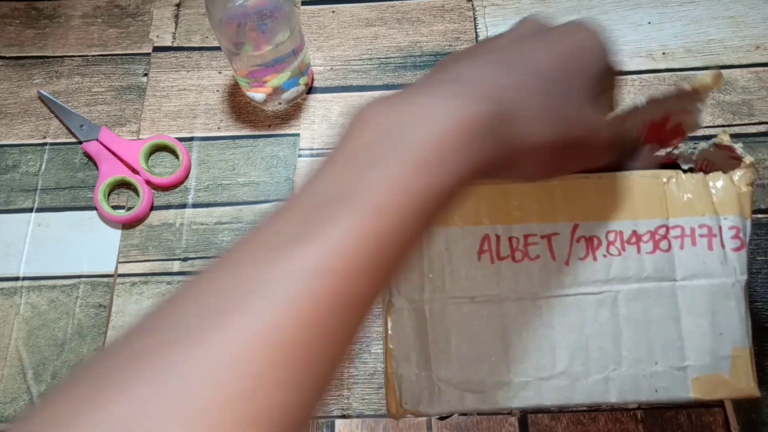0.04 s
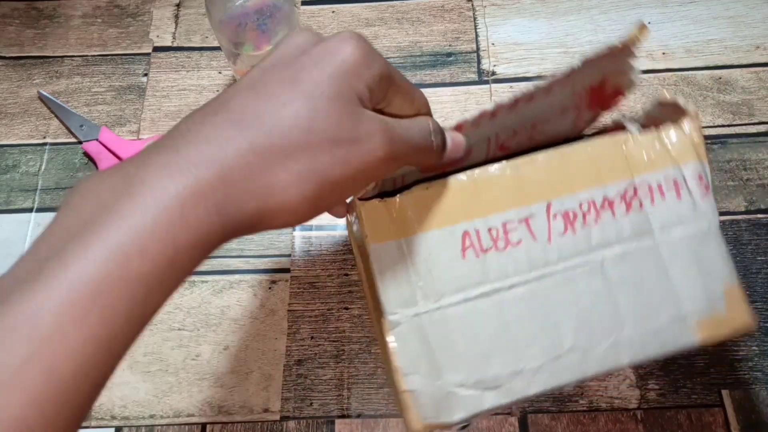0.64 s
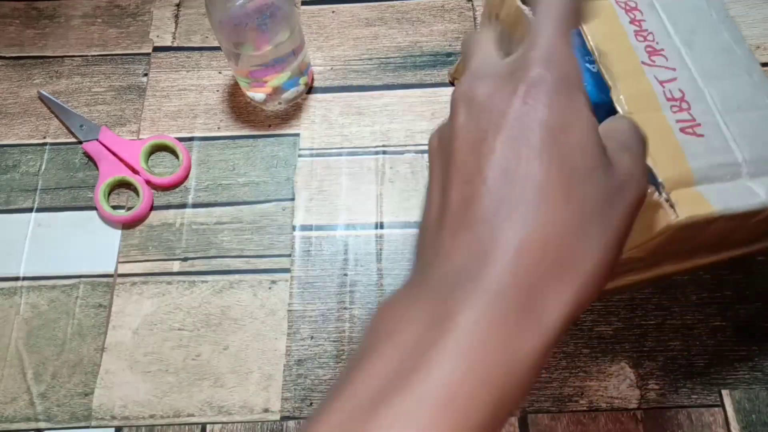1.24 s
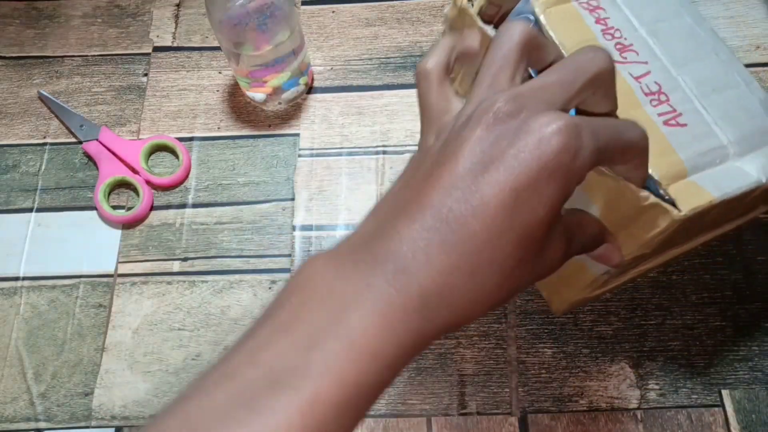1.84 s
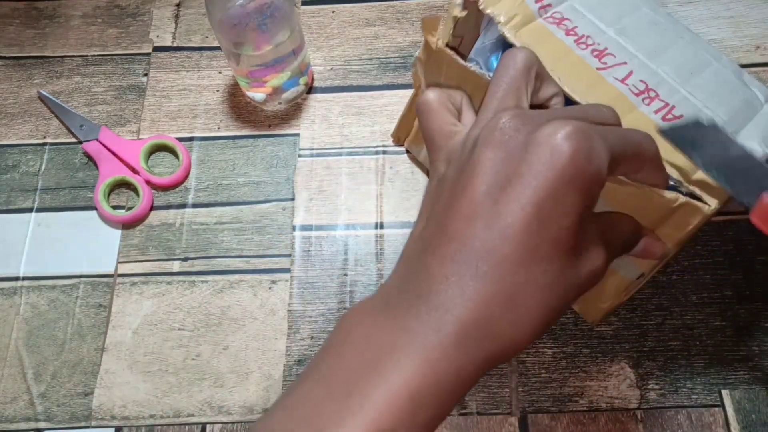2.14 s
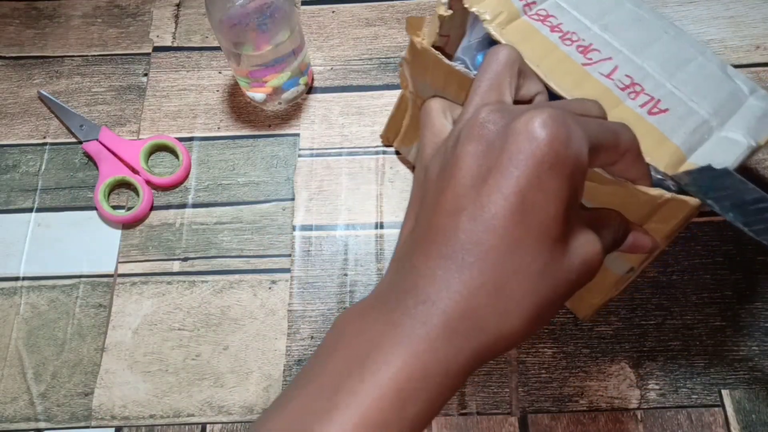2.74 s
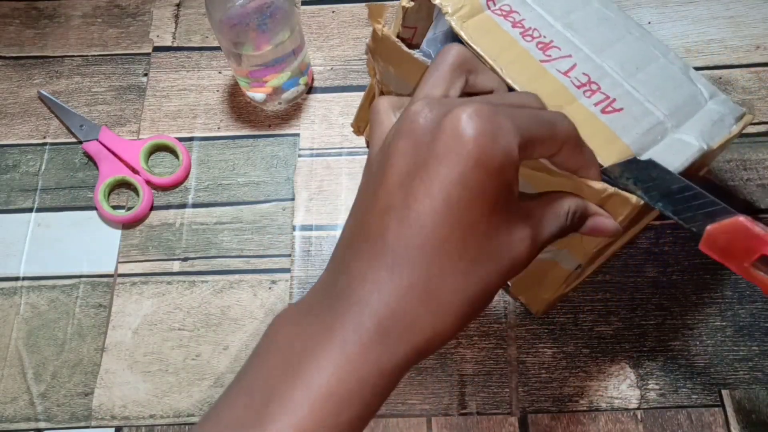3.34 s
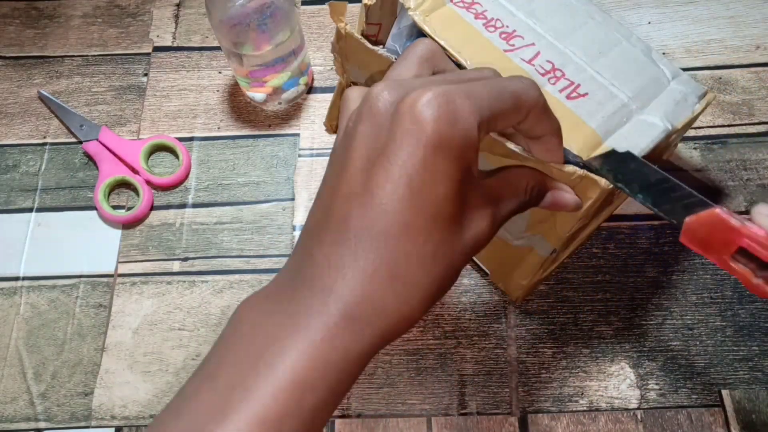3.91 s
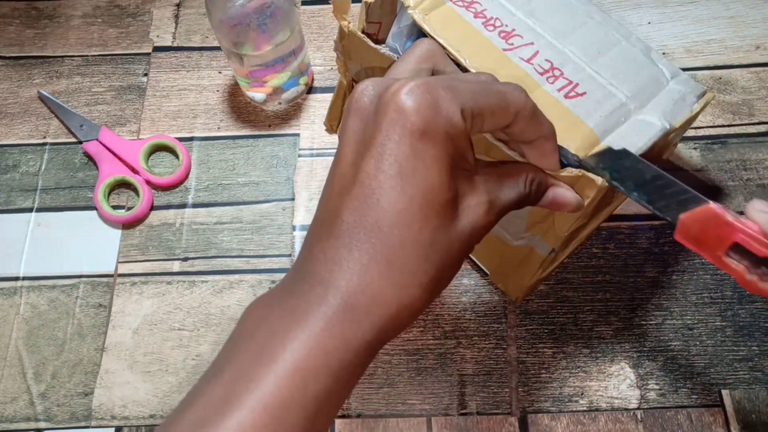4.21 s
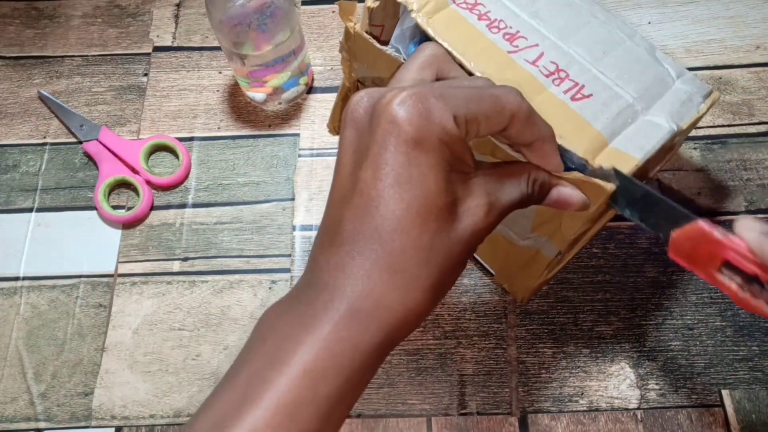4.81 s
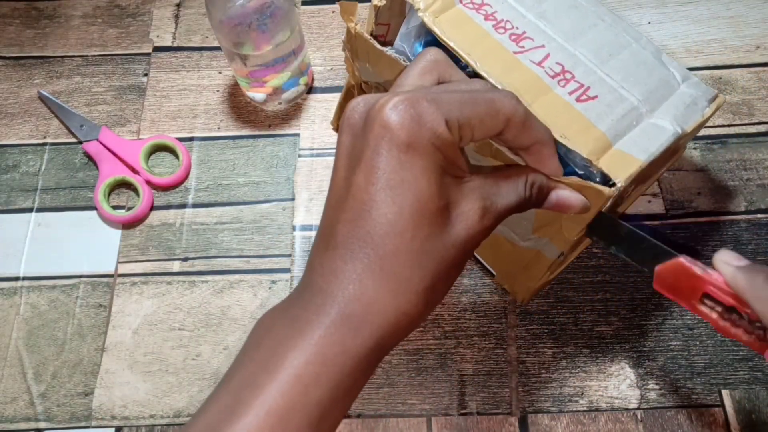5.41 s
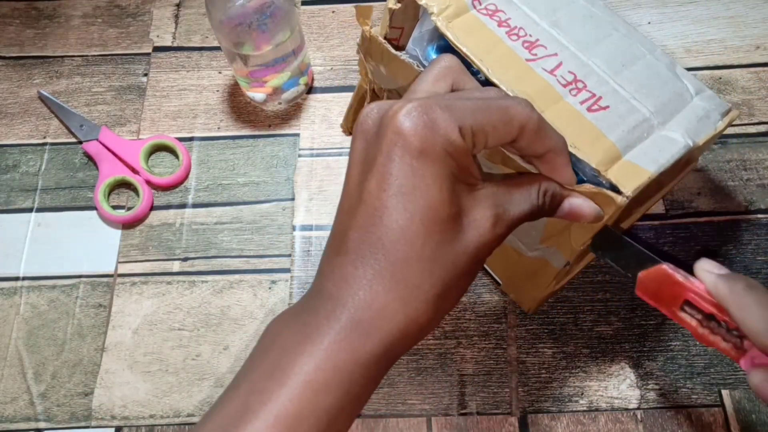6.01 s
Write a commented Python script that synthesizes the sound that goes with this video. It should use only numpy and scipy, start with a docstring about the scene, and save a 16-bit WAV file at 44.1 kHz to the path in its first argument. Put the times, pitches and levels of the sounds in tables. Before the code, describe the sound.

A cardboard parcel rustles and knocks as it is handled, then a box cutter saws through its tape in short strokes, with faint bird chirps.

```python
"""A taped cardboard parcel is gripped, dragged round on a table and pried at: friction makes it rustle
and hiss, its panels buckle with knocks, and its tape ticks and squeaks. From about 4.4 s a box cutter
saws through the taped edge in short strokes, each a stream of snapping fibres that excites the
resonances of box and blade. Throughout, the small, quiet room adds its reverberation, and now and then
a bird chirps some way off."""
import sys
import numpy as np
from scipy import signal
from scipy.fft import rfft, irfft, next_fast_len
from scipy.io import wavfile
from scipy.ndimage import map_coordinates

SR = 44100
rng = np.random.default_rng(int(sys.argv[2]) if len(sys.argv) > 2 else 0)


def digitize_waveform(pressure):
    """Quantize a signal to 16-bit integers and store it at the path in sys.argv[1].

    Rows of a 2-D input are taken as channels; values are limited to [-1, 1].
    """
    field = np.atleast_2d(pressure).T
    bounded = np.clip(field, -1, 1)
    quanta = np.round(bounded * 32767).astype(np.int16)
    wavfile.write(sys.argv[1], SR, quanta)


N = 271656
TIME = np.arange(N) / SR

# Normal modes of the box. Each row: frequency in Hz, bandwidth in Hz, gain in dB.
BOX = [(115.5, 24, -7.5), (174, 42, -10), (279, 83, -12), (303, 21.4, -6.5), (368, 28, -7.5),
       (469.5, 42, -1.5), (540.4, 61, 1.5), (625, 15, -3), (715, 34, 0.5), (724, 30, -21), (883, 13, 2),
       (1040, 68, -22), (1270, 22, -18), (1460, 110, -19), (1600, 55, -15), (1836, 55, -16),
       (2000, 70, -24), (2640, 68, -21)]
# Spectra of rubbed panels and the sliding underside. Each row: frequency in Hz, relative level in dB.
RUSTLE = [(25, -14), (60, -0.5), (100, 3), (200, -4.5), (350, -4), (520, 3.5), (750, 1.5), (1100, -4),
          (1600, -13), (2600, -14.5), (4000, -27), (9000, -41)]
SLIDE = [(300, -39), (1200, 3.5), (2600, 4.5), (3700, -3), (5000, -3), (6500, 1), (8000, 1.5), (11000, 1),
         (14000, -3.5), (16000, -9)]
# A hand shifts its grip or pushes the box. Each row: start in seconds, length in seconds,
# crest as a share of the length, panel rustle in dB, sliding hiss in dB.
RUBS = [(0, 0.16, 0.97, -60, -61.5), (0.154, 0.19, 0.12, -53.5, -55.5), (0.321, 0.16, 0.18, -52, -58.5),
        (0.513, .095, 0.73, -66.5, -72), (0.587, 0.15, 0.046, -55.5, -62),
        (0.707, 0.197, 0.76, -57.5, -51.5), (0.916, 0.042, 0.24, -48, -52),
        (0.972, 0.25, 0.28, -54.5, -51.5), (1.249, 0.13, 0.36, -47.5, -60.5), (1.385, 0.07, 0.11, -62, -74),
        (1.626, 0.069, 1, -60.5, -62), (1.679, 0.14, .12, -51, -58), (1.852, 0.21, 0.074, -58.5, -62.5),
        (2.077, 0.15, 0.62, -61, -62.5), (2.308, 0.026, .15, -52, -60.5), (2.35, 0.2, 0.12, -69.5, -78),
        (2.657, 0.16, .4, -64.5, -71.5), (2.895, 0.23, 0.39, -58, -64.5), (3.155, 0.13, .2, -58, -67),
        (3.351, 0.16, 0.91, -55.5, -68), (3.569, 0.21, 0.76, -57.5, -62.5),
        (3.826, 0.097, .6, -68.5, -73.5), (4.224, 0.13, 0.28, -70, -79.5)]
# The bottom edge digs into the table as the box turns. Each row: start in seconds, length in seconds,
# crest as a share of the length, level in dB.
SCRAPES = [(.75, .135, .8, -56)]

def handling():
    """Sliding friction: fingers catch on the panels, the underside hisses and one edge scrapes."""
    held_rustle_db, held_hiss_db = -79.5, -87  # the hand merely holding the box
    rustle_gain = np.hypot(amp(held_rustle_db), rubbing([(*move, db) for *move, db, _ in RUBS]))
    hiss_gain = np.hypot(amp(held_hiss_db), rubbing([(*move, db) for *move, _, db in RUBS]))
    catches = grains(rate=1400, spread_db=3.2, smooth=.7) * amp(1.4 * wobble(70))
    panels = unit(coloured(catches, RUSTLE) + .5 * unit(ring(catches, BOX)))
    slips = grains(rate=3000, spread_db=2, smooth=.9) * amp(1.3 * wobble(60))
    underside = coloured(slips, SLIDE)
    edge = unit(ring(grains(rate=2500, spread_db=1, smooth=.93), [(6100, 2900, 0)]))
    return rustle_gain * panels + hiss_gain * underside + rubbing(SCRAPES) * edge


# Spectrum of cut fibres. Each row: frequency in Hz, relative level in dB.
FIBRES = [(300, -9), (1200, -18), (2000, 3.5), (3000, -1.5), (4300, -1), (5500, 0), (8000, -1.5),
          (11000, 1), (14000, -3.5), (16000, -11)]
# Normal modes of the blade. Each row: frequency in Hz, bandwidth in Hz, gain in dB.
BLADE = [(4100, 150, -3), (4880, 200, 1), (5430, 130, -5), (6200, 360, 4), (8100, 95, 8), (10600, 570, -4)]
# Strokes of the blade; the wall stiffens as the cut nears the corner. Each row: start in seconds,
# length in seconds, crest as a share of the length, attack in seconds, wall level in dB, rasp level
# in dB, wall resonance in Hz, bass mode gain in dB, blade ring relative to the fibres in dB.
STROKES = [(4.41, 0.075, 0.41, 0.011, -38.5, -49.5, 530, 5, 0),
           (4.584, 0.12, 0.42, .02, -58, -66, 586, 4, -2),
           (4.676, 0.11, 0.73, 0.0081, -46, -58, 524, 7.5, -4),
           (4.804, .05, 0.45, .02, -61.5, -63.5, 543, 13, -20),
           (4.874, 0.069, 0.45, .005, -38.5, -48, 544, -5, -10),
           (5.099, 0.14, 0.64, .014, -40.5, -48.5, 610, 9, -14),
           (5.338, .12, 0.53, 0.056, -43.5, -49.5, 553, 4, -10),
           (5.548, 0.13, 0.38, 0.016, -49.5, -56.5, 596, 10.5, -12),
           (5.798, .11, 0.41, 0.052, -50, -60, 686, -1, -23),
           (6.105, .09, 0.73, .06, -62.5, -66, 640, 4, -9)]

def cutter():
    """Fracture excites resonance: snapping fibres sound directly, through the wall and the steel."""
    out = np.zeros(N)
    fibres = grains(rate=2000, spread_db=3.6, smooth=.45) * amp(1.7 * wobble(180))
    for start, length, crest, attack, wall_db, rasp_db, wall_hz, bass_db, blade_db in STROKES:
        effort = push(length, crest, attack, swell_db=5, drop_db=7, fade_db_per_s=158)
        snaps = np.roll(fibres, -round(start * SR))[:len(effort)]
        # modes near the resonance of the uncut wall respond most strongly
        modes = [(hz, width, db + bass_db * (hz < 450) + 4 * np.exp(-((hz - wall_hz) / 90) ** 2))
                 for hz, width, db in BOX]
        wall = ring(snaps, modes + [(wall_hz, 170, -2)])
        wall = unit(filtered(wall, lambda hz: 1 / (1 + (hz / 2600) ** 4) / (1 + (70 / (hz + 1)) ** 4)))
        tuning = 1 + .049 * rng.standard_normal()  # the blade's free length differs with each stroke
        steel = unit(ring(snaps, [(hz * tuning, width, db) for hz, width, db in BLADE]))
        rasp = unit(coloured(snaps, FIBRES) + amp(blade_db) * steel)
        add(out, start - attack, effort * (amp(wall_db) * wall + amp(rasp_db) * rasp))
    return out


# Panels buckle, are jerked by the blade or bump the table.
# Each row: start in seconds, level in dB, frequency in Hz, rise time in seconds.
KNOCKS = [(.181, -41, 423, 0.004), (.237, -36, 1035, 0.0016), (.341, -47.5, 728, 0.01),
          (0.366, -42.5, 1030, 0.0029), (0.389, -42.5, 1383, 0.0032), (0.595, -45, 1113, 0.0053),
          (.664, -39, 356, .002), (.716, -45, 724, .0029), (.919, -45, 985.5, 0.0049),
          (.935, -38, 102, 0.0078), (1.014, -40, 1220, 0.0017), (1.13, -44.5, 590, 0.0017),
          (1.23, -43, 636, 0.0016), (1.293, -40.5, 527, 0.0046), (1.329, -45, 560, 0.0063),
          (1.35, -43, 534, 0.004), (1.357, -41, 870, 0.0044), (1.365, -40, 480, 0.0017),
          (1.632, -49, 734, .0027), (1.6829, -25, 715, 0.0018), (1.683, -34.5, 1024, 0.0022),
          (1.685, -32.5, 404, 0.0027), (1.876, -45, 617, 0.0047), (1.989, -51, 485, 0.0038),
          (2.299, -47.5, 460, 0.0037), (2.306, -52.5, 160, 0.012), (2.477, -58.5, 520, 0.0069),
          (3.1726, -39, 550, 0.0016), (3.173, -43, 855, 0.0016), (3.203, -38, 495, 0.0029),
          (3.396, -37.5, 516, 0.0056), (3.3969, -44, 990, 0.0021), (3.832, -46.5, 490, 0.0014),
          (4.44, -37.5, 598, 0.0085), (4.686, -38.5, 503, 0.0022), (4.8802, -21, 224, 0.0021),
          (4.885, -46, 123, 0.016), (4.913, -33, 618, 0.0053), (5.168, -46, 214, 0.0027),
          (5.181, -34.5, 330, 0.0013), (5.38, -38.5, 516, 0.0035), (5.408, -41, 1060, 0.0064),
          (5.767, -60, 750, .002)]

def knocks():
    """Damped oscillation: a panel gives way with a few swings and a crunch, exciting the box's modes."""
    out, t = np.zeros(N), np.arange(SR // 8) / SR
    for start, db, hz, rise in KNOCKS:
        envelope = (t / rise * np.exp(1 - t / rise)) ** 2
        crunch = unit(ring(rng.standard_normal(len(t)), [(hz, .69 * hz, 0)]))
        add(out, start, amp(db) * envelope * (np.sin(2 * np.pi * hz * t) + .32 * crunch))
    return out + amp(-2) * ring(out, BOX)


# Tape and card edges snap. Each row: start in seconds, level in dB, spectral peak in Hz.
TICKS = [(0.1361, -40.5, 10400), (0.2014, -37, 7360), (0.367, -43.5, 6460), (0.393, -38, 5300),
         (0.431, -46.5, 8400), (.474, -53, 11000), (0.5985, -43, 5700), (.715, -40, 10900),
         (1.016, -44, 12000), (1.366, -45.5, 6960), (1.635, -47, 9400), (1.6896, -32, 9300),
         (1.8022, -35.5, 9400), (1.882, -46, 5000), (2.027, -48.5, 9000), (2.051, -45.5, 9400),
         (3.173, -48, 7200), (3.369, -56, 6050), (3.3977, -62, 5240), (3.497, -55.5, 7100),
         (4.179, -61.5, 7000), (4.5512, -41.5, 8900), (4.8254, -51, 5930), (5.595, -45.5, 5860),
         (5.637, -46, 6800)]

def ticks():
    """Sudden release radiates a broadband transient: tape lets go with two bright, close cracks."""
    out, t = np.zeros(N), np.arange(SR // 25) / SR
    for start, db, hz in TICKS:
        gap = rng.uniform(.001, .0025)
        first = amp(-60 * t / .0046)
        second = .63 * (t > gap) * amp(-60 * np.abs(t - gap) / .02)
        fizz = ring(rng.standard_normal(len(t)), [(hz, .43 * hz, 0), (1500, 1500, -8)])
        fizz = unit(filtered(fizz, lambda f: 1 / (1 + (f / 14500) ** 8)))
        add(out, start, amp(db) * (first + second) * fizz)
    return out


# Tape peels or slips. Each row: start in seconds, length in seconds, frequency in Hz, level in dB.
SQUEAKS = [(0.599, 0.0034, 5580, -46.5), (2.299, 0.032, 5580, -62), (2.457, 0.042, 5830, -70.5),
           (2.467, 0.036, 3860, -72)]

def squeaks():
    """Stick-slip oscillation: tape grips and slides with a thin whistle of nearly steady pitch."""
    notes = [(start, length, hz, hz, db) for start, length, hz, db in SQUEAKS]
    return whistles(notes, waver=.047, rate=1100)


# Decay outdoors. Each row: frequency in Hz, reverberation time in seconds.
YARD = [(100, 0.39), (3000, 0.41)]
# Bird notes. Each row: start in seconds, length in seconds, first and last pitch in Hz, level in dB.
CHIRPS = [(.133, .08, 3180, 3106, -60), (.336, 0.077, 3100, 2936, -59), (.422, 0.053, 2837, 2555, -55.5),
          (2.909, 0.095, 3190, 3144, -66), (3.047, 0.1, 2696, 2545, -67.5), (3.13, 0.12, 3057, 2754, -62.5),
          (3.188, 0.054, 2510, 2650, -56.5), (4.999, 0.036, 2980, 2430, -67),
          (5.06, 0.043, 2240, 2710, -67), (5.2, .039, 3200, 2600, -59), (5.245, 0.044, 2570, 3086, -62)]

def bird():
    """At a distance the reverberant field outweighs the direct sound of the short, wavering notes."""
    notes = whistles(CHIRPS, waver=.023, rate=450)
    return notes + amp(2.3) * echo(notes, YARD)


# Decay in the room. Each row: frequency in Hz, reverberation time in seconds.
ROOM = [(100, 0.85), (500, 0.16), (3000, 0.59), (8000, 0.18), (15000, 0.3)]
# Spectrum of the still room. Each row: frequency in Hz, relative level in dB.
QUIET = [(20, 2), (60, -1), (110, -1.5), (220, -5), (550, -9.5), (1000, -19), (2500, -19), (5000, -31),
         (15000, -30)]

def room(direct):
    """Superposition: the direct sound, its diffuse reflections and a faint ambient noise add up."""
    ambient = amp(-76) * coloured(rng.standard_normal(N), QUIET)
    return direct + amp(-12) * echo(direct, ROOM) + ambient


def push(length, crest, attack, swell_db, drop_db, fade_db_per_s):
    """Amplitude envelope of a movement: it takes hold, swells, eases, lets go and trails off."""
    let_go_s, trail_s = .012, .3
    t = np.arange(round((attack + length + trail_s) * SR)) / SR - attack
    hold_db = np.interp(t, [0, np.clip(crest, .02, .98) * length, length], [-swell_db, 0, -swell_db])
    after = np.maximum(t - length, 0)
    release_db = -drop_db * np.minimum(after / let_go_s, 1) - fade_db_per_s * after
    return np.clip(1 + t / attack, 0, 1) ** 2 * amp(hold_db + release_db)


def rubbing(rows):
    """Incoherent sources add in power: the joint envelope of overlapping hand movements."""
    power = np.zeros(N)
    for start, length, crest, db in rows:
        attack = max(min(.99 * crest * length, start), 1 / SR)  # a slow swell also takes hold slowly
        effort = push(length, crest, attack, swell_db=4.5, drop_db=9.5, fade_db_per_s=106.5)
        add(power, start - attack, (amp(db) * effort) ** 2)
    return np.sqrt(power)


def grains(rate, spread_db, smooth):
    """Shot noise: uneven snaps, on average rate a second, over a share of smooth friction noise."""
    impulses = (rng.random(N) < rate / SR) * rng.choice([-1, 1], N)
    sizes = amp(spread_db * np.clip(rng.standard_normal(N), -2, 2))
    return unit(unit(impulses * sizes) + smooth * rng.standard_normal(N))


def whistles(rows, waver, rate):
    """Frequency modulation: short tones glide linearly while their pitch wavers at random."""
    out, drift = np.zeros(N), 1 + waver * wobble(rate)
    for start, length, start_hz, end_hz, db in rows:
        progress = np.linspace(0, 1, max(round(length * SR), 2))
        pitch = (start_hz + (end_hz - start_hz) * progress) * drift[round(start * SR):][:len(progress)]
        envelope = np.sqrt(np.abs(np.sin(np.pi * progress)))
        add(out, start, amp(db) * envelope * np.sin(2 * np.pi * np.cumsum(pitch) / SR))
    return out


def ring(x, modes):
    """Modal response: x drives parallel resonators, each with a frequency, bandwidth and gain."""
    return sum(amp(db) * signal.lfilter(*signal.iirpeak(hz, hz / width, SR), x)
               for hz, width, db in modes)


def echo(x, decay):
    """Reverberation: convolution with a noise tail in which each frequency decays at its own rate."""
    hz, t, spectra = signal.stft(rng.standard_normal(SR // 2), SR, nperseg=256)
    tail = signal.istft(spectra * amp(-60 * t / along(decay, hz)[:, None]), SR, nperseg=256)[1]
    tail = np.pad(tail, (round(.005 * SR), 0))
    return signal.fftconvolve(x, tail / np.linalg.norm(tail))[:N]


def coloured(x, spectrum):
    """Spectral shaping: x weighted by a spectrum in dB, at rms 1."""
    return unit(filtered(x, lambda hz: amp(along(spectrum, hz))))


def filtered(x, response):
    """Linear filtering: the spectrum of x times a frequency response."""
    size = next_fast_len(len(x) + 8192)
    return irfft(rfft(x, size) * response(np.fft.rfftfreq(size, 1 / SR)), size)[:len(x)]


def wobble(rate):
    """Random modulation: a smooth curve through rate knots a second."""
    knots = rng.standard_normal(int(N * rate / SR) + 4)
    return map_coordinates(knots, [TIME * rate], order=2)


def along(points, hz):
    """Interpolation on a logarithmic frequency axis."""
    frequencies, values = np.transpose(points)
    return np.interp(np.log(hz + 1), np.log(frequencies + 1), values)


def amp(db):
    """Decibels to amplitude ratio."""
    return 10 ** (np.asarray(db) / 20)


def unit(x):
    """Normalisation to rms 1."""
    return x / np.sqrt(np.mean(x ** 2) + 1e-20)


def add(track, start, sound):
    """Superpose a sound on the track from start, in seconds."""
    part = track[max(round(start * SR), 0):][:len(sound)]
    part += sound[:len(part)]


def scene():
    """Sound pressures add: the parcel close by in a quiet room, the bird beyond."""
    parcel = handling() + cutter() + knocks() + ticks() + squeaks()
    return (room(parcel) + bird())[None]


def record(dry):
    """Band limiting: the microphone thins the deepest bass and passes nothing above its top frequency."""
    bass_hz, top_hz = 55, 15750
    thinned = signal.sosfilt(signal.butter(2, bass_hz, "highpass", fs=SR, output="sos"), dry)
    return np.array([filtered(channel, lambda hz: hz < top_hz) for channel in thinned])


dry = scene()
out = record(dry)
digitize_waveform(out)
```